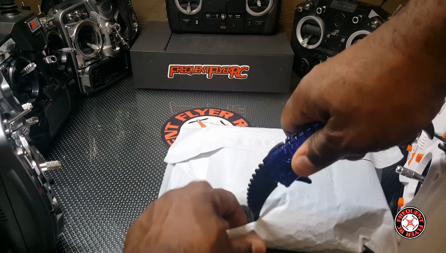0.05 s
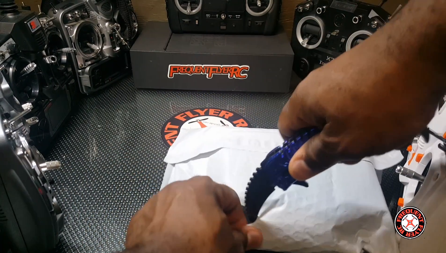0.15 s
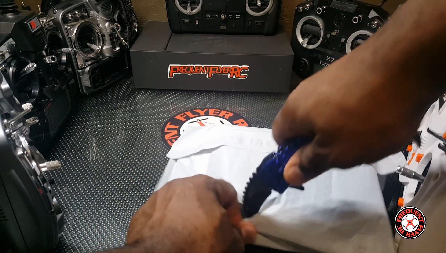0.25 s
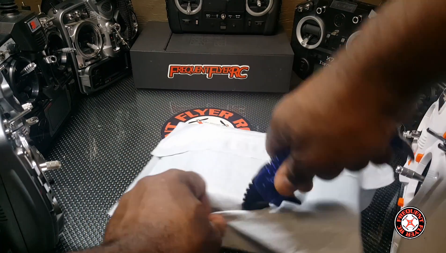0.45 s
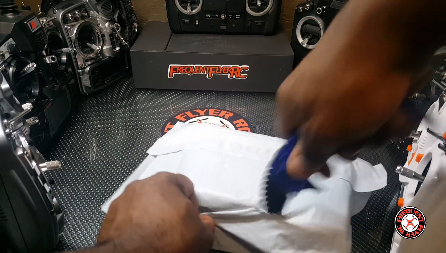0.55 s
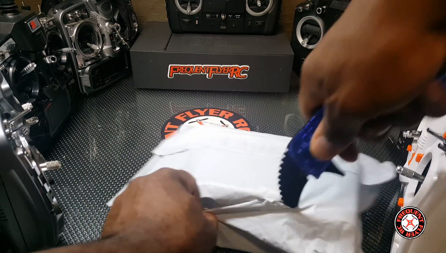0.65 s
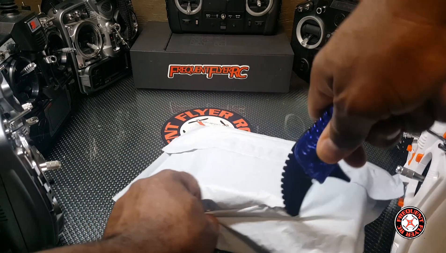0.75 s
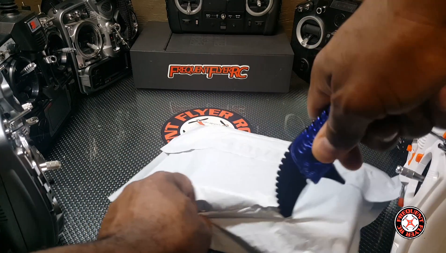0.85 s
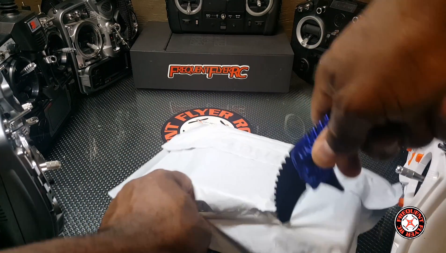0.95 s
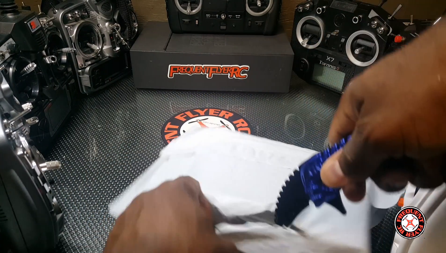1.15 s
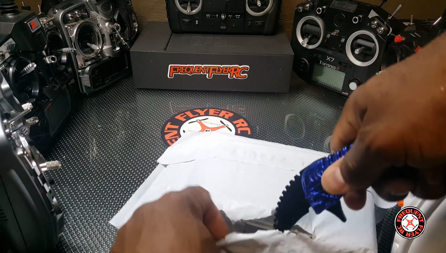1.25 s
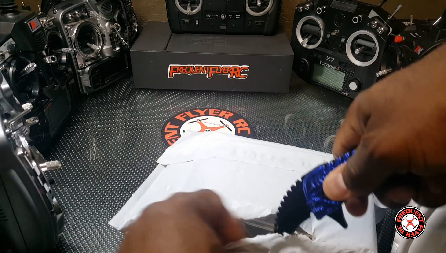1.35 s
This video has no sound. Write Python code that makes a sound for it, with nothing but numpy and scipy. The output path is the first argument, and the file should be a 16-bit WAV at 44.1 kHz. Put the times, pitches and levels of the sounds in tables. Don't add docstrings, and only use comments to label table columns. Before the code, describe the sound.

A padded plastic mailer is pulled and cut open on a table: faint film rubbing, then dense bright crackles, tearing bursts and hollow thuds, easing to sparse crinkles, close to the microphone in a small room.

```python
import sys
import numpy as np
from scipy import signal
from scipy.fft import rfft, irfft, next_fast_len
from scipy.io import wavfile
from scipy.ndimage import map_coordinates

SR = 44100
rng = np.random.default_rng(int(sys.argv[2]) if len(sys.argv) > 2 else 0)


def transcribe(signal):
    frames = np.atleast_2d(signal).T
    limited = np.clip(frames, -1, 1)
    pcm = np.round(limited * 32767).astype(np.int16)
    wavfile.write(sys.argv[1], SR, pcm)


def gain_from_decibels(decibels):
    exponent = np.asarray(decibels, float) / 20
    return 10 ** exponent


N = 61739
CREASE_RISE = 0.52
ONSET_DELAY_S = 0.00102


def unit(x):
    return x / np.sqrt(np.mean(x ** 2) + 1e-20)


def along(points, hz):
    f, value = np.transpose(points)
    return np.interp(np.log(hz + 1), np.log(f + 1), value)


def wobble(rate):
    return map_coordinates(rng.standard_normal(int(N * rate / SR) + 4), [np.arange(N) * rate / SR])


def coloured(x, spectrum):
    size = next_fast_len(N + 8192)
    gain = gain_from_decibels(along(spectrum, np.fft.rfftfreq(size, 1 / SR)))
    return unit(irfft(rfft(x, size) * gain, size)[:N])


def ring(t, hz, t60, rise_s):
    return np.sin(2 * np.pi * hz * t) * gain_from_decibels(-60 * t / t60) * (1 - np.exp(-(t / rise_s) ** 2))


def add(track, s, sound):
    track[round(s * SR):][:len(sound)] += sound


# frequency in Hz, level in dB per Hz.
HUM_SPECTRUM = [(15, -40), (25, -34), (208, 10.5), (349, -15.5), (1250, -1), (2150, -35), (10100, -15),
                (15200, -45), (16500, -53)]


def hum():
    return gain_from_decibels(-53) * coloured(rng.standard_normal(N), HUM_SPECTRUM)


# frequency in Hz, t60 in seconds.
ROOM_DECAY = [(200, 0.19), (2000, 0.16), (4500, 0.12), (12000, 0.023)]


def room(x):
    out = np.zeros(N + SR)
    delay_s = 0.002
    for start in range(0, N, SR // 4):
        hz, t, bins = signal.stft(rng.standard_normal(SR // 3), SR, nperseg=256)
        decay = gain_from_decibels(-60 * t / along(ROOM_DECAY, hz)[:, None])
        tail = signal.istft(bins * decay, SR, nperseg=256)[1]
        tail = tail / np.linalg.norm(tail)
        add(out, start / SR + delay_s, signal.fftconvolve(x[start:start + SR // 4], tail))
    return out[:N]


# time in seconds, strength in dB.
HANDLING = [(0, -44.5), (.1, -39), (.19, -43), (.3, -38.5), (.43, -33), (.52, -31.5), (.57, -34),
            (.67, -31.5), (.79, -43.5), (.86, -47.5), (.95, -49.5), (.99, -54), (1.03, -49.5), (1.061, -43),
            (1.13, -41.5), (1.25, -41.5), (1.29, -50.5), (1.4, -47.5)]
# frequency in Hz, level in dB per Hz.
RUSTLE_SPECTRUM = [(59, -13), (100, 5.5), (552, 0.5), (922, -7.5), (1440, -3.5), (4390, -10.5), (9470, -23),
                   (13900, -20), (16500, -70)]
# frequency in Hz, level in dB per Hz.
RUMBLE_SPECTRUM = [(20, -22), (40, -2.5), (65, -1), (110, -34), (180, -26.5)]


def rustle():
    s, db = np.transpose(HANDLING)
    strength_db = np.interp(np.arange(N) / SR, s, db)
    grains = rng.standard_normal(N) * gain_from_decibels(3 * wobble(500))
    rub = gain_from_decibels(strength_db - 0.5 + 1.94 * wobble(25.3)) * coloured(grains, RUSTLE_SPECTRUM)
    rumble_db = -50 + 0.63 * (strength_db - strength_db.mean())
    return rub + gain_from_decibels(rumble_db) * coloured(rng.standard_normal(N), RUMBLE_SPECTRUM)


# time in seconds, peak in dB, fold pitch in Hz,
# level of the bag modes over the fold in dB, t60 of the fold in seconds.
THUDS = [(0.036, -28.5, 434, -6, .03), (0.069, -24.5, 219, -6, 0.032), (0.076, -25.5, 134, -17, 0.065),
         (0.205, -19, 337, -9, 0.025), (0.263, -32.5, 246, -6, .04), (0.31, -19.5, 211, -4, 0.041),
         (0.333, -24.5, 294, -6, 0.038), (0.357, -24.5, 190, -17, 0.067), (0.377, -19.5, 202, -15, 0.031),
         (0.42, -24, 554, 3, 0.066), (0.431, -21, 178, -29, 0.06), (0.4764, -12, 845, -5, 0.013),
         (0.4828, -11, 311.4, -22, 0.049), (0.578, -17.5, 196, 2, 0.046), (0.588, -26, 149, 0, 0.037),
         (0.6852, -3, 299.4, 0, 0.05), (0.7142, -9, 549, -17, 0.028), (0.7224, -13, 319, -11, 0.066),
         (0.75, -23.5, 597, -12, 0.045), (0.813, -29, 236, 3.5, 0.085), (0.901, -30, 215, -14, 0.055),
         (1.113, -33, 520, -25, 0.051), (1.256, -27.5, 90, 0, .07), (1.15, -20, 562, -5.5, 0.046),
         (1.165, -26.5, 248, -10, 0.099), (1.209, -21, 267, -1, 0.04), (1.357, -34, 320, -18, 0.027)]
# frequency in Hz, level in dB, t60 in seconds.
BAG_MODES = [(195, -13, .06), (240, -12, .05), (325, -6, .05), (530, -6, .05), (678, -8, .05),
             (830, -13, .02)]


def thuds():
    out, t = np.zeros(N + SR), np.arange(SR // 6) / SR
    attack_s = 0.0018
    for s, db, fold_hz, bag_db, fold_t60 in THUDS:
        thud = ring(t, fold_hz, fold_t60, attack_s)
        for hz, mode_db, t60 in BAG_MODES:
            level = gain_from_decibels(rng.normal(mode_db + bag_db, 1.5))
            mode = level * ring(t, hz * rng.normal(1, 0.025), t60, attack_s)
            if abs(hz - fold_hz) > hz / 8:
                thud = thud + mode
        add(out, s + ONSET_DELAY_S, -gain_from_decibels(db - 1.5) * thud / abs(thud).max())
    return out[:N] * (1 + 0.12 * wobble(150))


# start in seconds, length in seconds.
TEAR_SPANS = [(.062, .03), (.207, .012), (.36, .024), (.385, .018), (.412, .009), (.423, .016), (.47, .032),
              (.576, .022), (.615, .052), (.668, .017), (.69, .055), (1.035, .07), (1.165, .1)]
# level in dB, grain pitch in Hz.
TEARS = [(-39, 1320), (-40, 1860), (-29.5, 1600), (-41, 3300), (-33, 3700), (-22, 1760), (-25, 1540),
         (-27, 1450), (-31, 1650), (-23.5, 2150), (-38, 1080), (-44, 5200), (-42.5, 1250)]
# frequency in Hz, level in dB per Hz.
FILM_SPECTRUM = [(180, -26), (300, 0), (1190, 5.5), (2030, -10), (2700, 7.5), (4100, -4.5), (12000, -8.5),
                 (15200, -36), (16500, -50)]


def tears():
    now, t = np.arange(N) / SR, np.arange(400)[None] / SR
    release_s, grains_per_s, grain_cycles, spread_octaves = 0.05, 1600, 5.4, 0.6
    bursts = []
    for (s, length), (db, _) in zip(TEAR_SPANS, TEARS):
        fall_db = 60 * np.clip(now - s - length, 0, 1) / release_s
        bursts.append(gain_from_decibels(db - fall_db) * (now > s))
    bursts = np.array(bursts)

    count = int(grains_per_s * N / SR)
    at = (rng.random(count) * N).astype(int)
    centre = np.array(TEARS)[bursts.argmax(axis=0)[at], -1]
    hz = centre * 2 ** (spread_octaves * rng.standard_normal(count))
    hz = np.clip(hz, 400, 14000)[:, None]
    level = gain_from_decibels(-4 * np.log(rng.random((count, 1)) + 0.035))
    sign = np.sign(rng.random((count, 1)) - 0.5)
    grains = level * sign * np.sqrt(hz) * ring(t, hz, grain_cycles / hz, CREASE_RISE / hz)
    places = at[:, None] + np.arange(400)
    crackle = unit(np.bincount(places.ravel(), grains.ravel())[:N])

    hiss = coloured(rng.standard_normal(N) * gain_from_decibels(3.1 * wobble(400)), FILM_SPECTRUM)
    return bursts.sum(axis=0) * unit(crackle + gain_from_decibels(0.5) * hiss)


# time in seconds, peak in dB, crease pitch in Hz, crack over it in dB, padding over it in dB.
SNAPS = [(0.0233, -28.5, 2700, -24, -7.5), (0.037, -25, 3200, -24, -11), (0.0675, -14, 3260, -17, -16),
         (0.1037, -22, 3080, -15, -7), (0.2125, -13, 3180, -27, -38),
         (0.2402, -11.5, 2600, -23, -14.5), (0.2655, -8.5, 2720, -13, -8),
         (0.3113, -6.5, 3210, -34, -19), (0.334, -12.5, 3050, -26, -14), (0.346, -11, 3080, -30, -19),
         (0.359, -9.5, 4000, -10, -4.5), (0.3704, -14.5, 3030, -23, -9),
         (0.3734, -20.5, 1420, -5.5, -1.5), (0.3789, -22, 2360, -36, 0.5),
         (0.3934, -21, 1560, -12, -17), (0.412, -18, 2000, -6, -22), (0.4211, -4.5, 1820, -23, -8.5),
         (0.4339, -12, 2340, -3, -8),
         (0.4707, -1, 2590, -27, -12), (0.4778, -12, 2800, -19, -0.5), (0.4834, -8, 1490, -14.5, -24),
             (0.4964, -16, 2300, -24, -41), (0.5559, -19.5, 5440, -14, -15), (0.5745, -9, 2500, -13, -9),
             (0.5864, -11.5, 1890, -20, -19), (0.5915, -17, 10900, -19, -5),
             (0.6159, -13.5, 2850, -24, -14), (0.6203, -10, 2330, -16, -12), (0.6343, -15, 2570, -28, -20),
             (0.6572, -13, 2600, -24, -26), (0.6683, -23, 2210, -36, -2), (0.6735, -5, 2510, -20, -39),
             (0.6847, -8, 1550, -19.5, -7), (0.7144, -12.5, 1320, -41, -14),
             (0.7365, -16.5, 2640, -35, -12), (0.7586, -15.5, 2960, -14, -9.5),
         (0.8066, -14.5, 3750, -14.5, -16), (0.8835, -8.5, 4000, -17.5, -23),
              (0.9379, -17, 3200, -38, -15), (1.021, -33.5, 3720, -1, -42), (1.0767, -26, 3000, -12, -10),
              (1.0827, -24, 3370, -19, -35), (1.0892, -26, 3200, -20, -37), (1.0967, -29.5, 3360, -26, -36),
              (1.1116, -19.5, 1880, -18, -41), (1.1121, -19.5, 3440, -19, -30),
              (1.1987, -23.5, 1800, -13, -14), (1.2632, -37, 3210, -25, -7),
              (1.3303, -18, 2600, -15.5, -17.5), (1.3592, -27.5, 1470, -16.5, -31),
              (1.369, -30, 1530, -35, -20),
         (0.019, -34.5, 1870, -19, -3.5), (0.056, -28, 2820, -30, -15),
               (0.063, -22.5, 1780, -15.5, -8), (0.0754, -28, 2900, -25, -14),
               (0.1956, -22.5, 10000, -34, -30), (.2053, -15.5, 846, -23, -30),
               (0.2091, -15, 2950, -19, -23), (0.291, -23, 3000, -20, -17), (0.2978, -30, 3570, -24, -28),
               (0.3067, -14.5, 9700, -30, -17), (0.3215, -20, 3000, -14, -12), (0.3648, -21, 2270, -7, -23),
               (0.3744, -15.5, 3000, -15, -12), (0.396, -18, 2400, -13, -11), (0.401, -37, 3040, -17, -20),
               (0.4157, -10, 6700, -22, -39), (0.4285, -17, 3030, -11, -6),
               (0.4318, -5.5, 2830, -21.5, -8.5), (0.439, -29, 1800, -22, 0), (.4678, -3.5, 2740, -28, -16),
               (0.4818, -17, 3620, -33, -17), (.4862, -11, 2600, -19, -18), (0.4895, -10, 2700, -20, -6),
               (0.498, -22, 2800, -3, -16), (.501, -14, 2300, -26, -30), (0.5147, -20.5, 2570, -23, -32),
               (.6712, -21.5, 1820, -14, -23), (.581, -21, 2900, -7, -12), (0.648, -15, 2800, -24, -20),
               (.811, -26.5, 3600, -6, -20), (.831, -27, 3800, -18, -13), (0.944, -25.5, 3400, -13, -19)]


def snaps():
    out, t = np.zeros(N + SR), np.arange(SR // 30) / SR
    crack_band = signal.butter(2, [8600 - 5300, 8600 + 5300], "bandpass", fs=SR)
    crack_shape = gain_from_decibels(-60 * t / 0.0045) * (1 - np.exp(-t / 0.0001))
    pad_hz, pad_t60 = 1297, 0.012
    for s, db, hz, crack_db, pad_db in SNAPS:
        crack = signal.lfilter(*crack_band, rng.standard_normal(len(t)) * crack_shape)
        t60, rise_s = 9 / hz, CREASE_RISE / hz
        overtone_hz = 1.63 * hz * gain_from_decibels(rng.normal(0, 1))
        crease = ring(t, hz, t60, rise_s) + gain_from_decibels(-16) * ring(t, overtone_hz, t60, rise_s)
        pad = ring(t, pad_hz * gain_from_decibels(rng.normal(0, 0.73)), pad_t60, CREASE_RISE / pad_hz)
        snap = gain_from_decibels(crack_db + 11) * crack - 2 * crease - gain_from_decibels(pad_db + 7.5) * pad
        add(out, s + ONSET_DELAY_S, gain_from_decibels(db) * snap)
    return out[:N]


def scene():
    low_cut = signal.butter(3, 136, "highpass", fs=SR, output="sos")
    mailer = signal.sosfilt(low_cut, snaps() + thuds() + tears())
    return (mailer + gain_from_decibels(-15.5) * room(mailer) + rustle() + hum())[None]


def band_limit(x):
    return signal.sosfilt(signal.butter(12, 17000, fs=SR, output="sos"), x)


def record(dry):
    roll_off = signal.butter(2, 14600, fs=SR, output="sos")
    edge = signal.ellip(8, 1, 24, 15800, fs=SR, output="sos")
    mix = signal.sosfilt(np.vstack([roll_off, edge]), dry)
    return band_limit(mix)


dry = scene()
out = record(dry)
transcribe(out)
```